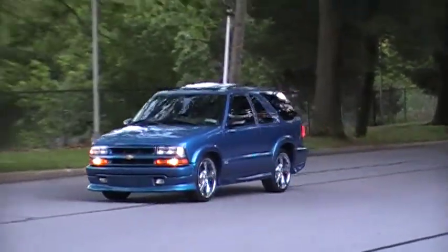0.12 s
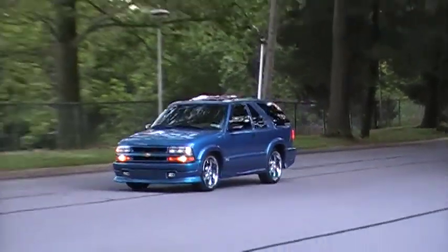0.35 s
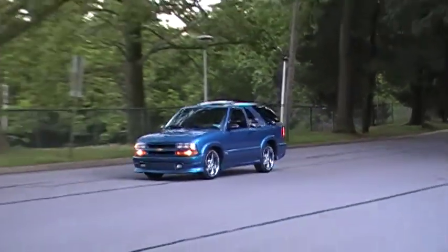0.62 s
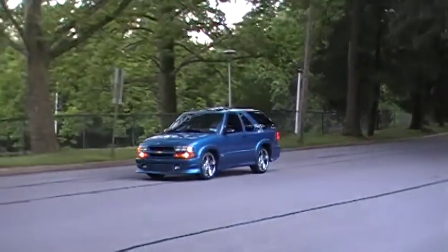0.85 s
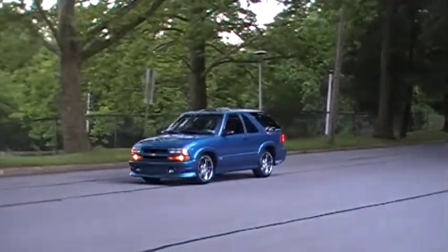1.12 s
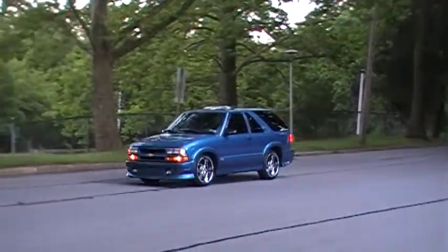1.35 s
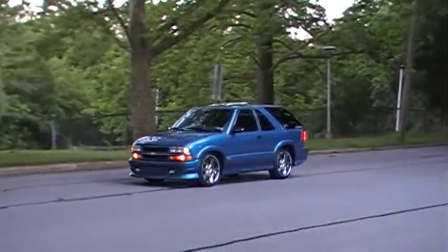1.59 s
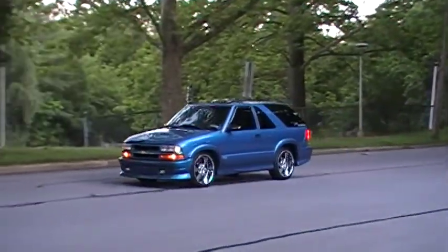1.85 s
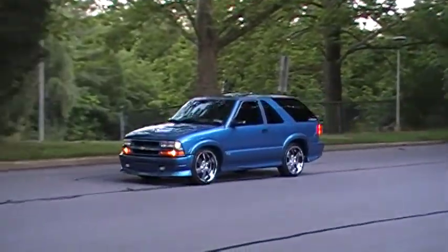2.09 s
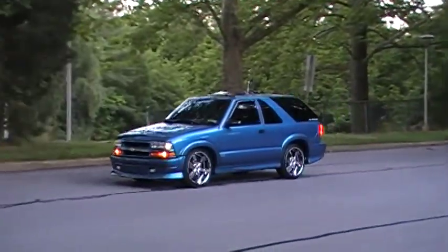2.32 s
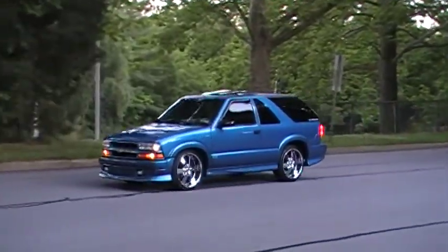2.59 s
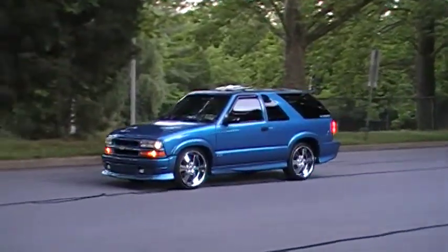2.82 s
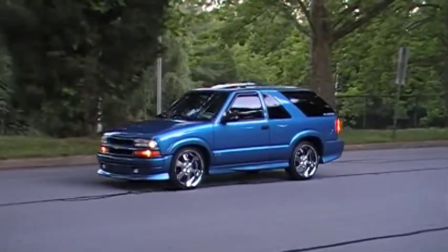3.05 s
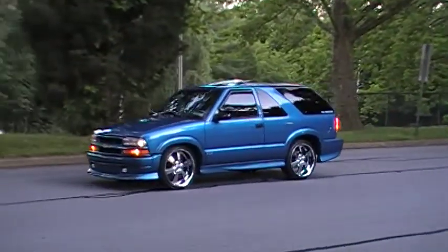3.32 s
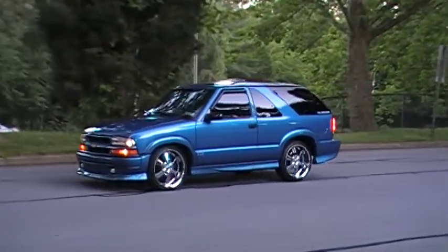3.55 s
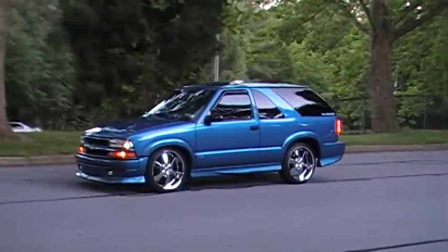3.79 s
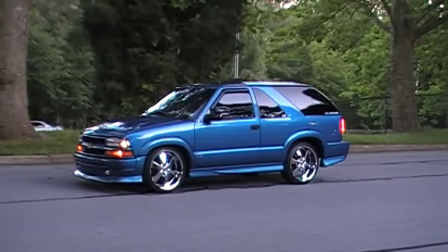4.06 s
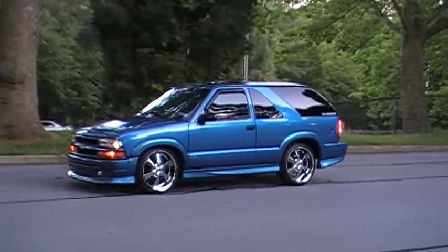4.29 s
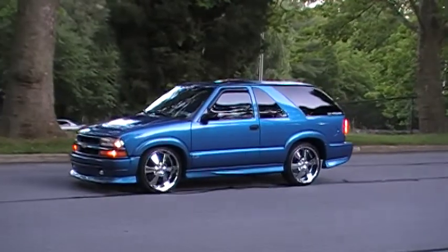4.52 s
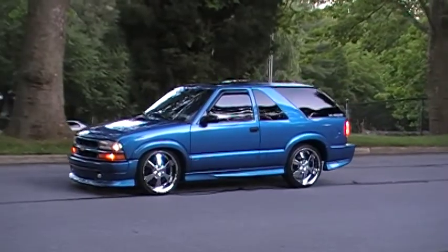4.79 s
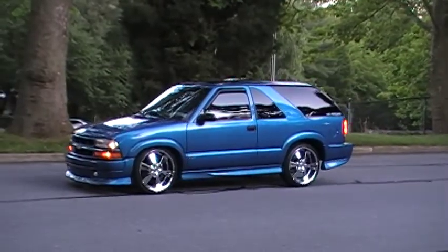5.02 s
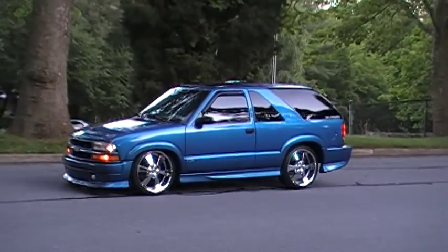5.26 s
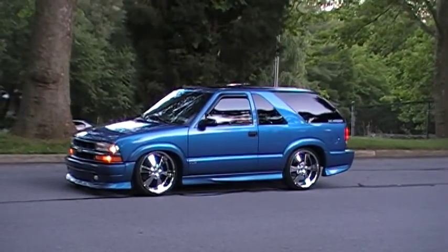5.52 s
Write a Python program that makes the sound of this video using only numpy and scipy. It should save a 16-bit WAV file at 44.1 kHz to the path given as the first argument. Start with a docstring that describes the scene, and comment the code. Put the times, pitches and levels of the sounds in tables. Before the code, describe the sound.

Outdoors on a leafy road, a slowing small truck gives a soft low rumble and tyre roar, its engine sinking into a throbbing idle. Very high brake squeaks come and go. Birds whistle briefly. Then suspension air blasts out three times, far louder than everything else: two short pops of hiss ending in thuds, then a long one running to the end. A stereo handheld recorder at the roadside ducks the background under each blast.

```python
"""Tree-lined road: a small truck slows, engine orders throbbing near idle, brakes squeaking faintly.
Three valve openings dump suspension air: a pop, a bright noise jet with a hose echo, a closing thud.
The trees answer the jets and the birds' gliding whistles with a noise tail.
Shaped noise makes rumble, tyres, leaves and wind; the recorder's gain control ducks all under the jets."""
import sys
import numpy as np
from scipy import signal
from scipy.fft import rfft, irfft, next_fast_len
from scipy.io import wavfile
from scipy.ndimage import uniform_filter1d

SR = 44100
rng = np.random.default_rng(int(sys.argv[2]) if len(sys.argv) > 2 else 0)


def dump_mix(stems):
    """Bounce the given channels to the path in sys.argv[1] as a 16-bit WAV at rate SR."""
    frames = np.atleast_2d(stems).T  # one column per channel
    limited = np.clip(frames, -1, 1)  # hard clip at full scale
    pcm = np.round(limited * 32767).astype(np.int16)
    wavfile.write(sys.argv[1], SR, pcm)


def amplitude_ratio(level_db):
    """Convert a level in decibels to the matching linear amplitude (field) ratio."""
    exponent = np.asarray(level_db, float) / 20
    return 10 ** exponent


N = 248724
TIME_S = np.arange(N) / SR
PADDED = next_fast_len(2 * N)
HZ = np.maximum(np.arange(PADDED // 2 + 1) * SR / PADDED, 1)

# Source levels are those ahead of record(); spectra are relative, scaled to unit rms in use.
# background levels: (time [s], rumble [dB], tyres [dB], leaves [dB])
ROAD_LEVELS = [(0, -40.5, -39.5, -55), (1, -40.5, -39.5, -53.5), (2, -39, -40.5, -52),
               (3, -39.5, -41.5, -52), (4, -40, -41, -48.5), (5.64, -40, -33, -59)]
# road rumble spectrum: (frequency [Hz], density [dB per Hz])
RUMBLE_SPECTRUM = [(24, -46), (40, -14), (64, 3), (86, -10), (104, -3.5), (129, 1), (275, -10.5),
                   (311, -6.5), (600, -17), (780, -83), (1320, -120)]
# tyre roar spectrum: (frequency [Hz], density [dB per Hz])
TYRE_SPECTRUM = [(290, -2), (500, -8), (891, -1.5), (1270, -7.5), (1730, -8.5), (2380, -14), (5000, -29.5),
                 (6500, -64), (11000, -120)]
# leaf rustle spectrum: (frequency [Hz], density [dB per Hz])
LEAF_SPECTRUM = [(2060, -2.5), (3500, -5.5), (3920, -13.5), (4840, -4.5), (8690, -2.5), (12500, -16.5),
                 (16000, -42)]
# left-right correlation of the road noise: (frequency [Hz], likeness [0..1])
STEREO_LIKENESS = [(35, 1), (70, 0.98), (240, 0.98), (950, 0.85), (3770, 0.77), (15000, 0.85)]
# narrow low noise bands: (frequency [Hz], width [Hz], start level [dB], end level [dB])
DRONE_BANDS = [(119.5, 7, -46, -51), (145, 10, -48, -49)]
# engine cycle rate: (time [s], rate [Hz])
CYCLE_RATE = [(0, 20), (1.4, 19.6), (2.2, 17.5), (2.75, 17), (3.25, 18.4), (3.55, 18.4), (3.85, 16.6),
              (4.4, 16), (4.7, 15), (5.1, 14.4), (5.64, 13.6)]
# exhaust order level on resonance: (time [s], level [dB])
EXHAUST_LEVEL = [(0, -58), (1.2, -54), (1.7, -47), (2.2, -38.5), (2.75, -35.5), (3.3, -38.5), (3.85, -37),
                 (4.4, -37.5), (4.8, -33), (5.64, -37)]
# steady engine orders: (multiple of cycle rate, level [dB])
STEADY_ORDERS = [(3, -73), (6, -61), (7, -57.5), (8, -59), (9, -71), (10, -56)]
# brake squeaks: (peak time [s], frequency [Hz], peak level [dB], rise over the last 20 dB [s])
BRAKE_SQUEAKS = [(.37, 12700, -70, .03), (.77, 12750, -68, .03), (.78, 11350, -54, 0.044),
                 (1.2, 11350, -59, .04), (1.2, 12700, -72, .03), (1.64, 11400, -48, .037),
                 (1.66, 12750, -69, .03), (2.2, 12750, -51, 0.068), (2.844, 12680, -35.5, 0.024),
                 (3.86, 12700, -33, 0.085)]
# bird notes: (start [s], length [s], from [Hz], to [Hz], peak level [dB], bend: >1 glides late, <1 early)
BIRD_NOTES = [(3.14, .105, 2120, 3050, -49.5, 1.9), (3.275, .07, 3250, 2950, -47.5, 1.1),
              (3.35, .05, 3160, 3110, -59, 1.1), (3.39, .05, 2620, 2550, -51.5, .4),
              (3.072, .03, 3600, 4310, -55, .2), (3.46, .055, 2560, 2545, -54, 1.1),
              (3.48, .07, 6200, 5000, -55, .45), (3.97, .06, 2560, 2545, -53, 1.1),
              (4.075, .045, 2560, 2545, -53, 1.1), (4.075, .03, 3350, 4400, -53, 1.1)]
# valve openings: (open [s], shut [s], flow level [dB], hose resonance [Hz], its width [Hz],
#                  its fading [dB per s], share of hose echo and outlet whistle)
VALVE_OPENINGS = [(3.5403, 3.655, -8, 1550, 1490, -41, 0.2), (4.4429, 4.575, -8, 1664, 805, -1, 0.14),
                  (5.062, 5.7, -8, 1860, 500, 42, 0.31)]
# air jet spectrum: (frequency [Hz], density [dB per Hz])
JET_SPECTRUM = [(240, -46), (400, -12), (520, -28), (753, -11), (949, -8.5), (1330, -13), (2120, -5.5),
                (3210, -6), (3470, -12), (4950, -8), (9040, 2.5), (16000, -25)]
# wavering flow of the long release: (time [s], level change [dB])
FLOW_WAVER = [(5.12, -0.5), (5.36, 1.5), (5.42, -3), (5.53, 2.5), (5.64, -4.5)]
# outlet whistling: (frequency [Hz], width [Hz], level before the share [dB])
OUTLET_BANDS = [(3550, 150, -6), (4450, 400, -8)]
# tree tail: (frequency [Hz], late t60 [s], relative band level [dB])
TREE_BANDS = [(720, 0.68, -3), (1380, 1, 0.5), (2670, 0.88, 4.5), (5000, 1, 12), (7900, 0.59, -1.5),
              (14000, 0.42, 4)]
# microphone balance: (frequency [Hz], left minus right [dB])
MIC_LEAN = [(40, -1.6), (180, -1.4), (550, -3), (1650, -1.4), (4970, 0.7), (15000, 3.3)]

WIND_DB, WIND_HZ, WIND_WIDTH_HZ = -55.5, 40, 30
EXHAUST_HZ, EXHAUST_WIDTH_HZ, FIFTH_DB = 77, 12, -1   # fifth order against the fourth
SQUEAK_FLUTTER_HZ, SQUEAK_FALL_HZ, SQUEAK_FALL_S, SQUEAK_T60_S = 60, 90, 0.15, 0.38
PHRASE_NOTES, PHRASE_REPEAT_S = 4, 1.014
NOTE_SOFT_ENDS_DB, NOTE_FLUTTER_DB = 4, 1.5
FLOW_START_DB, FLOW_RISE_S = -3.5, 0.016
POP_HZ, POP_T60_S, POP_DB = 317, 0.012, -2.5   # level against the valve's flow level
HOSE_DB, HOSE_ECHO_S = -9.5, 0.001247   # starting level against the jet
THUD_HZ, THUD_DB, THUD_T60_S, THUD_LEAD_S = 200, -19, 0.076, 0.0107
TREES_DB, TREES_START_S, TREES_RISE_S = -3.5, 0.01, 0.0075
EARLY_DB, EARLY_T60_S = 5, 0.38   # extra answer of nearby surfaces
BIRD_ECHO_SHARE = 0.9


def rms_one(x):
    """Scale to unit rms."""
    return x / np.sqrt(np.mean(x ** 2) + 1e-20)


def in_time(rows):
    """Columns of a curve at every sample."""
    time_s, *columns = np.transpose(rows)
    return [np.interp(TIME_S, time_s, column) for column in columns]


def at_hz(points, hz, column=1):
    """Table column read on a log-frequency axis."""
    table = np.array(points)
    return np.interp(np.log(hz), np.log(table[:, 0]), table[:, column])


def filtered(x, response):
    """Multiply the spectrum by a response given on HZ."""
    return irfft(rfft(x, PADDED) * response, PADDED)[..., :N]


def resonance(hz, width_hz):
    """Response of one resonance, unity at its peak."""
    return 1 / (1 + 1j * (HZ ** 2 - hz ** 2) / (HZ * width_hz))


def drift(rate_hz):
    """Slow random wander of unit rms."""
    return rms_one(filtered(rng.standard_normal(N), 1 / (1 + (HZ / rate_hz) ** 2)))


def narrow_noise(hz, width_hz):
    """Unit-rms noise through a doubled resonance."""
    return rms_one(filtered(rng.standard_normal(N), resonance(hz, width_hz) ** 2))


def wide_noise(spectrum, patchy_db):
    """Unit-rms stereo noise, partly alike left and right, then given a wandering level."""
    mid, side = rfft(rng.standard_normal((2, N)), PADDED)
    alike = np.clip(at_hz(STEREO_LIKENESS, HZ), 0, 1)
    pair = np.sqrt(1 + alike) * mid + np.sqrt(1 - alike) * side * [[1], [-1]]
    noise = irfft(pair * amplitude_ratio(at_hz(spectrum, HZ)), PADDED)[:, :N]
    return rms_one(noise) * amplitude_ratio(patchy_db * drift(2.2))


def wind():
    """Faint low lumps on the microphone ports, independent per channel."""
    return amplitude_ratio(WIND_DB) * rms_one(filtered(rng.standard_normal((2, N)), resonance(WIND_HZ, WIND_WIDTH_HZ)))


def road():
    """Rumble, tyre roar and leaf rustle as shaped stereo noise."""
    rumble_db, tyre_db, leaf_db = in_time(ROAD_LEVELS)
    rumble = amplitude_ratio(rumble_db) * wide_noise(RUMBLE_SPECTRUM, patchy_db=0.96)
    tyres = amplitude_ratio(tyre_db) * wide_noise(TYRE_SPECTRUM, patchy_db=0.2)
    leaves = amplitude_ratio(leaf_db) * wide_noise(LEAF_SPECTRUM, patchy_db=0.0)
    return rumble + tyres + leaves


def drones():
    """Wavering drones: noise in narrow low resonances."""
    return sum(amplitude_ratio(np.linspace(start_db, end_db, N)) * narrow_noise(hz, width_hz)
               for hz, width_hz, start_db, end_db in DRONE_BANDS)


def engine():
    """Cycle orders beat into a throb; fourth and fifth swell near the exhaust resonance."""
    (rate_hz,), (exhaust_db,) = in_time(CYCLE_RATE), in_time(EXHAUST_LEVEL)
    phase = 2 * np.pi * np.cumsum(rate_hz * (1 + 0.0047 * drift(2.8))) / SR
    orders = list(STEADY_ORDERS)
    for order, db in [(4, 0), (5, FIFTH_DB)]:
        detuning = 2 * (order * rate_hz - EXHAUST_HZ) / EXHAUST_WIDTH_HZ
        orders.append((order, exhaust_db + db - 10 * np.log10(1 + detuning ** 2)))
    return np.sqrt(2) * sum(amplitude_ratio(db + 0.72 * drift(2.7)) * np.cos(order * phase) for order, db in orders)


def brakes():
    """Brake squeaks: unsteady rings that swell, then sink in pitch and die."""
    out = np.zeros(N)
    for peak_s, hz, db, rise_s in BRAKE_SQUEAKS:
        age_s = TIME_S - peak_s
        flutter = drift(SQUEAK_FLUTTER_HZ) + 1j * drift(SQUEAK_FLUTTER_HZ)
        pitch_hz = hz - SQUEAK_FALL_HZ * np.clip(age_s / SQUEAK_FALL_S, 0, 1)
        phase = 2 * np.pi * np.cumsum(pitch_hz) / SR
        shape_db = np.where(age_s < 0, 20 * age_s / rise_s, -60 * age_s / SQUEAK_T60_S)
        out += amplitude_ratio(db + shape_db) * np.real(flutter * np.exp(1j * phase))
    return out


def whistle(start_s, length_s, from_hz, to_hz, db, bend):
    """One sine glide that swells and fades, fluttering on its way through the leaves."""
    part = np.clip((TIME_S - start_s) / length_s, 0, 1)
    ends = np.clip(np.minimum(part, 1 - part) * length_s / 0.0013, 0, 1)
    phase = 2 * np.pi * np.cumsum(from_hz + (to_hz - from_hz) * part ** bend) / SR
    level_db = db - NOTE_SOFT_ENDS_DB * (2 * part - 1) ** 2 + NOTE_FLUTTER_DB * drift(60)
    return np.sqrt(2) * ends * amplitude_ratio(level_db) * np.sin(phase)


def birds():
    """Whistled notes; the phrase of the first few is sung twice."""
    again = [(start_s + PHRASE_REPEAT_S, *rest) for start_s, *rest in BIRD_NOTES[:PHRASE_NOTES]]
    return sum(whistle(*note) for note in list(BIRD_NOTES) + again)


def valves():
    """Released air pops, then hisses through a hose whose open end returns an inverted echo."""
    out = np.zeros(N)
    waver_db = in_time(FLOW_WAVER)[0] * (TIME_S > FLOW_WAVER[0][0] - 0.04)
    for open_s, shut_s, db, hose_hz, hose_width_hz, fading_db_per_s, share in VALVE_OPENINGS:
        age_s = np.maximum(TIME_S - open_s, 0)
        flow_db = db + waver_db + FLOW_START_DB * np.clip(1 - age_s / FLOW_RISE_S, 0, 1)
        jet = rms_one(filtered(rng.standard_normal(N), amplitude_ratio(at_hz(JET_SPECTRUM, HZ))))

        lag_s = HOSE_ECHO_S * (1 + 0.022 * drift(3))   # the hose sways as the body sinks
        echo = np.interp(TIME_S - lag_s, TIME_S, filtered(jet, resonance(2300, 2600).real))
        echo = amplitude_ratio(3.7 * drift(3.9)) * echo
        hose = amplitude_ratio(HOSE_DB - fading_db_per_s * age_s) * narrow_noise(hose_hz, hose_width_hz)
        outlet = sum(amplitude_ratio(level_db + 2.1 * drift(6)) * narrow_noise(hz, width_hz)
                     for hz, width_hz, level_db in OUTLET_BANDS)
        hiss = jet - share * echo + hose + share * outlet

        eddies = amplitude_ratio(0.86 * drift(240))
        opening = np.clip((TIME_S - open_s - 0.001) / 0.0016, 0, 1)
        closing = np.clip((shut_s - TIME_S) / 0.0087, 0, 1)
        pop = -np.sin(2 * np.pi * POP_HZ * age_s) * amplitude_ratio(db + POP_DB - 60 * age_s / POP_T60_S)
        seated_s = np.maximum(TIME_S - shut_s + THUD_LEAD_S, 0)   # the plunger seats as the flow is cut
        thud = np.sin(2 * np.pi * THUD_HZ * seated_s) * amplitude_ratio(THUD_DB - 60 * seated_s / THUD_T60_S)
        out += amplitude_ratio(flow_db) * opening * closing * eddies * hiss + pop + thud
    return out


def trees(x):
    """Scattering off trunks and houses: a noise tail with its own decay per band, partly its own per ear."""
    age_s, tail = np.maximum(TIME_S - TREES_START_S, 0), 0
    shared, own = rng.standard_normal(N), rng.standard_normal((2, N))
    for hz in 400 * 2 ** np.arange(0, 5.6, 0.5):
        band = filtered(shared + 0.57 * own, np.exp(-(np.log2(HZ / hz) / 0.5) ** 2))
        t60_s = at_hz(TREE_BANDS, hz)
        decay_db = at_hz(TREE_BANDS, hz, column=2) - 60 * age_s / t60_s
        tail = tail + band * amplitude_ratio(decay_db) / np.sqrt(t60_s)
    early = amplitude_ratio(EARLY_DB - 60 * age_s / EARLY_T60_S)
    tail = tail * np.clip(age_s / TREES_RISE_S, 0, 1) * (1 + early)
    impulse = amplitude_ratio(TREES_DB) * tail / np.sqrt(np.sum(tail ** 2) / 2)
    return filtered(x, rfft(impulse, PADDED))


def scene():
    """All sources; the microphones lean right in the lows and left in the treble."""
    air, song = valves(), birds()
    tail = trees(air + BIRD_ECHO_SHARE * song)
    mix = wind() + road() + drones() + engine() + brakes() + song + air + tail
    return filtered(mix, amplitude_ratio(np.outer([0.5, -0.5], at_hz(MIC_LEAN, HZ))))


def top_cut(x):
    """Nothing passes above the cut-off."""
    return signal.sosfilt(signal.butter(12, 16480, fs=SR, output="sos"), x)


def record(dry):
    """Gain control ducks fast above a knee and recovers steadily; peaks rounded, band edges cut."""
    knee_db, slope, attack_s, release_db_per_s = -19.5, 0.68, 0.016, 95
    low_cut_hz, top_cut_hz = 63, 15800
    level_db = 10 * np.log10(uniform_filter1d(np.mean(dry ** 2, axis=0), size=441) + 1e-12)
    release_db = release_db_per_s * TIME_S
    held_db = np.maximum.accumulate(level_db + release_db) - release_db
    keep = np.exp(-1 / (attack_s * SR))
    duck_db = signal.lfilter([1 - keep], [1, -keep], slope * np.maximum(held_db - knee_db, 0))
    rounded = 1.412 * np.tanh(dry * amplitude_ratio(-duck_db) / 1.194)
    band = 1 / np.sqrt(1 + (low_cut_hz / HZ) ** 6) / np.sqrt(1 + (HZ / top_cut_hz) ** 600)
    return top_cut(filtered(rounded, band))


dry = scene()
out = record(dry)
dump_mix(out)
```